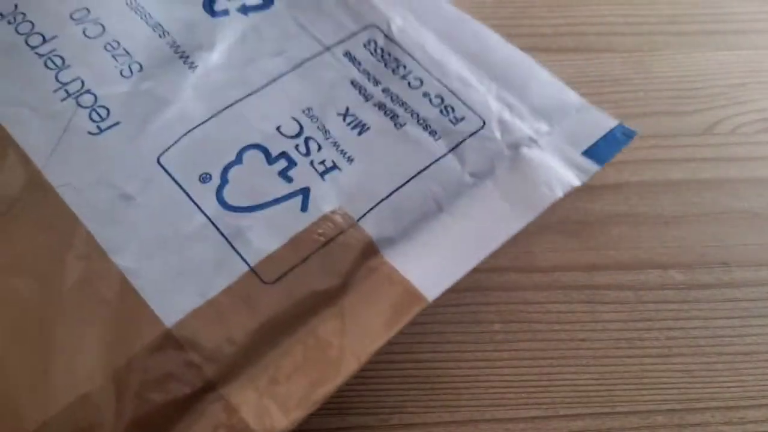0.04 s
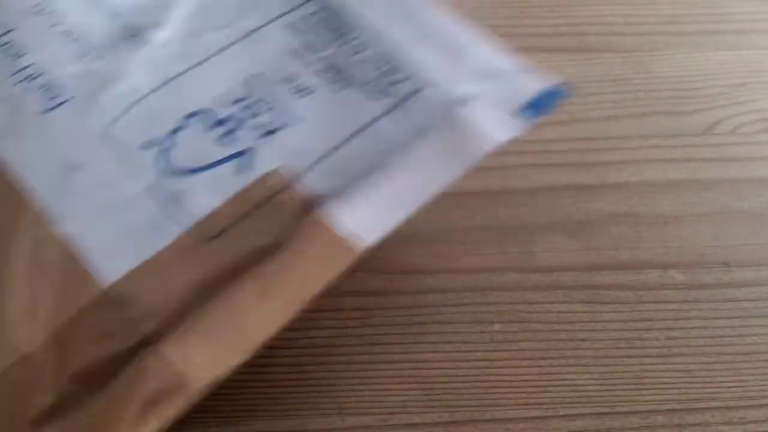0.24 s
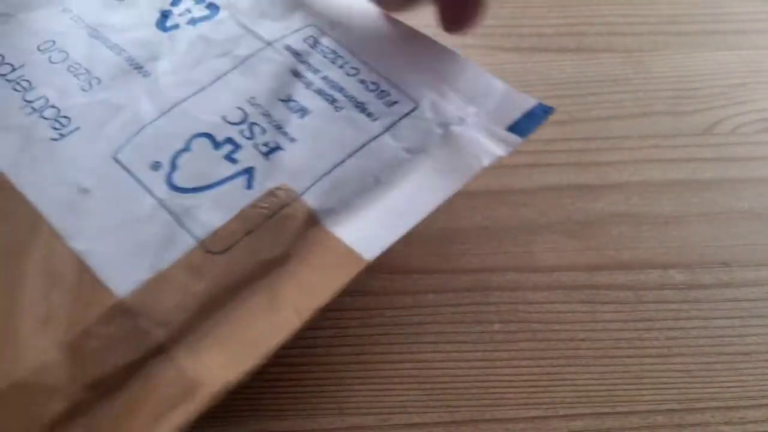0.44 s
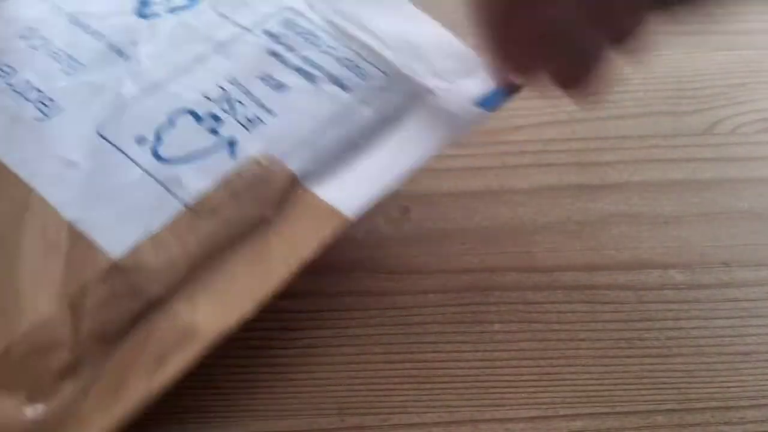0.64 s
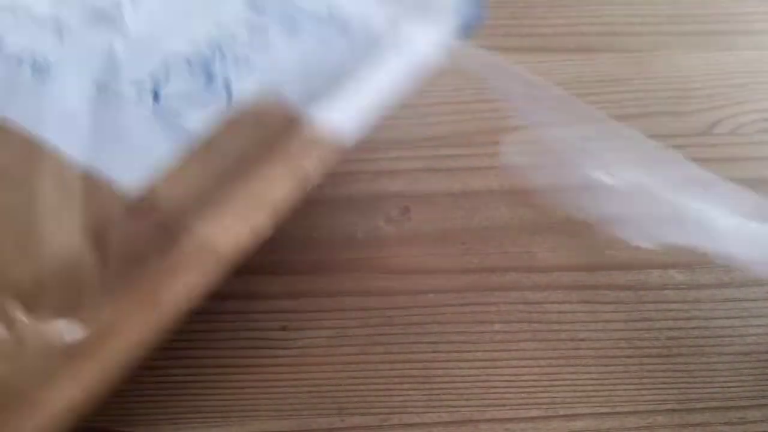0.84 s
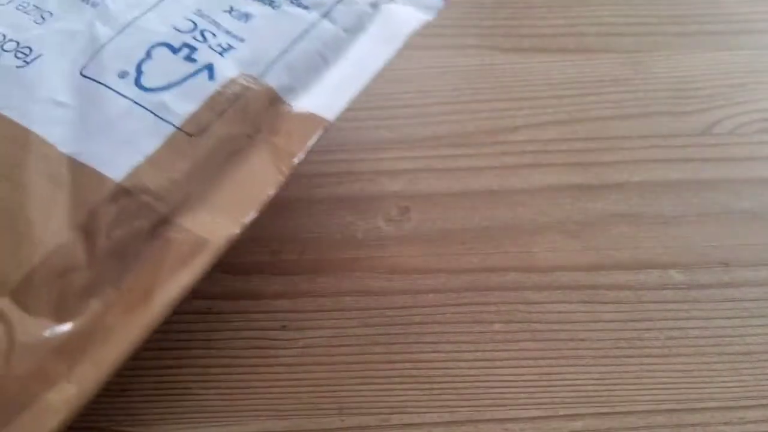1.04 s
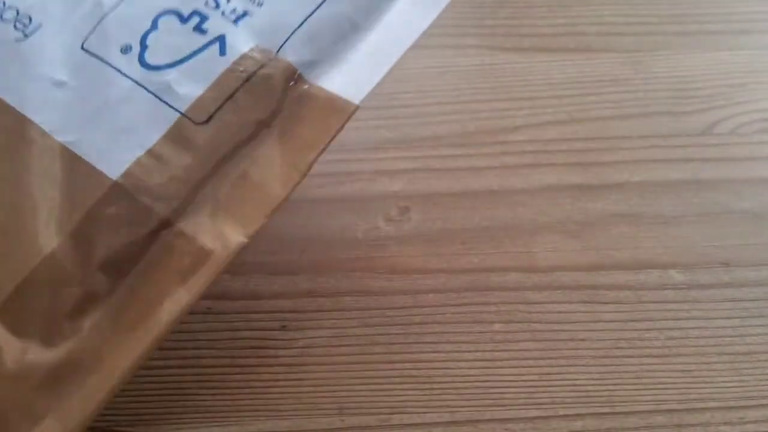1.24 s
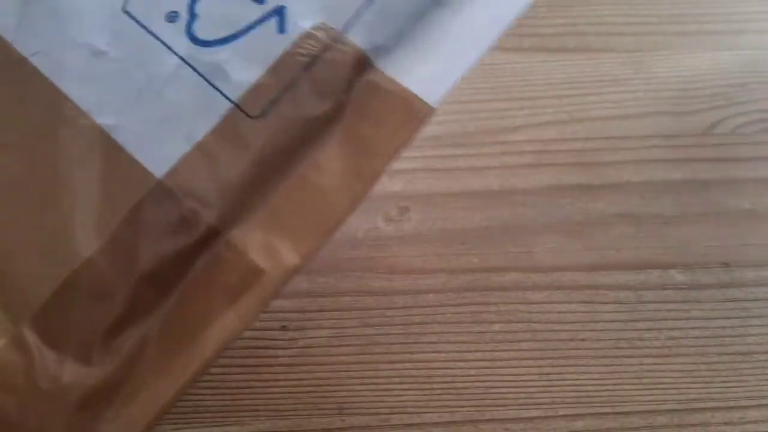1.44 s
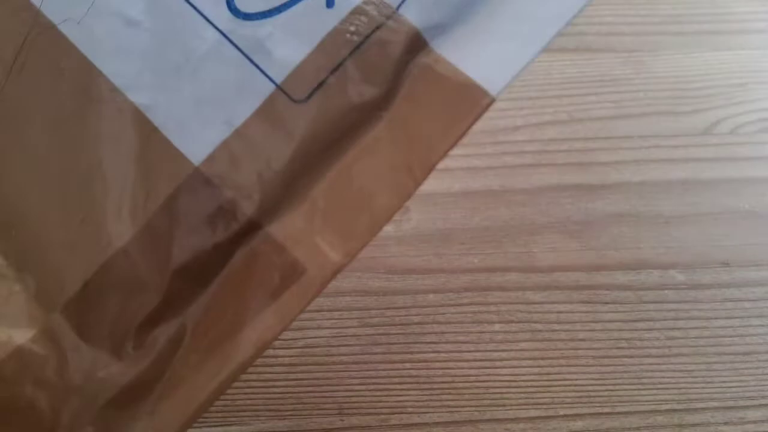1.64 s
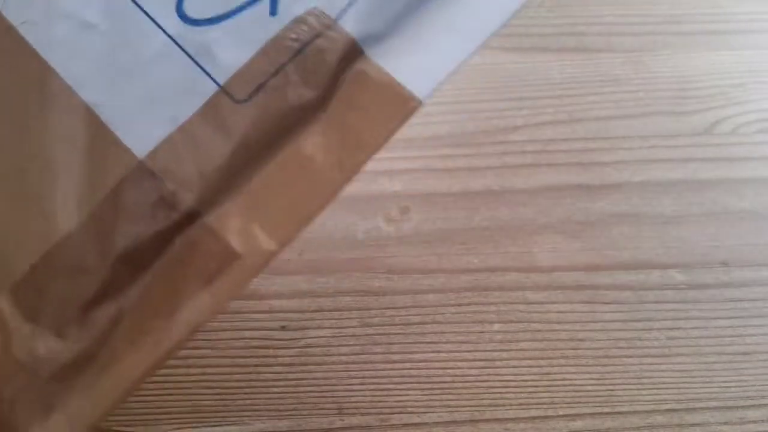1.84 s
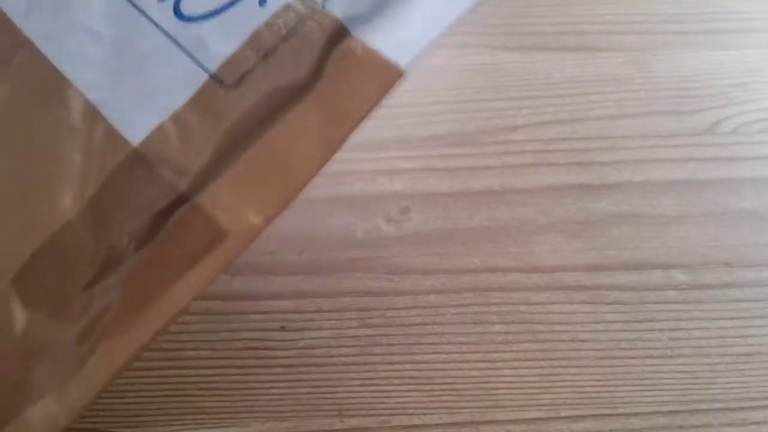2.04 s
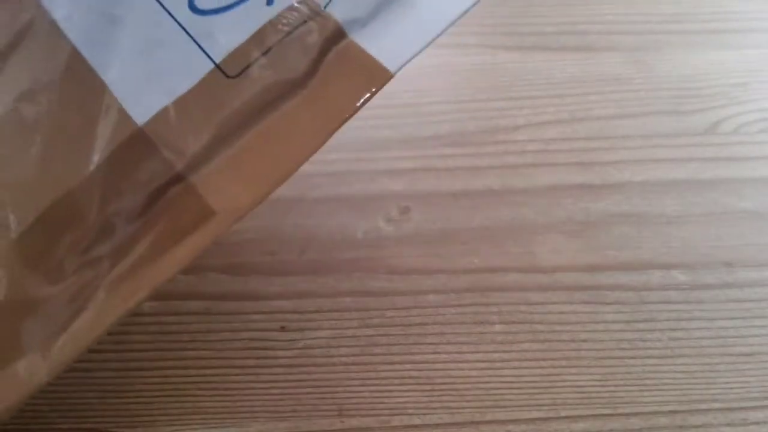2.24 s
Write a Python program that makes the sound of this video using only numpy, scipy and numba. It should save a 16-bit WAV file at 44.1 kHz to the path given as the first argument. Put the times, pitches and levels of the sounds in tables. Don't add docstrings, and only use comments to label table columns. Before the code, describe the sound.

Crackling padded paper mailer bent and pulled by hands on a wooden table, close up

```python
import sys
import numpy as np
from scipy import signal
from scipy.fft import rfft, irfft
from scipy.io import wavfile
from scipy.ndimage import uniform_filter1d
from numba import njit

SR = 44100
rng = np.random.default_rng(int(sys.argv[2]) if len(sys.argv) > 2 else 0)


def voltage_ratio(decibels):
    exponent = np.asarray(decibels, float) / 20
    return 10 ** exponent


def store_pcm(level_fs):
    pcm = np.round(np.clip(level_fs, -1, 1) * 32767).astype(np.int16)
    wavfile.write(sys.argv[1], SR, np.atleast_2d(pcm).T)


N = 101430

PORT_LAG_S, LAG_SPREAD_S = -0.000074, 0.00008
TREBLE_TOP_HZ = 15650
TABLE_PAN_DB = 3.5


def unit(x):
    return x / np.sqrt(np.mean(x ** 2))


def curve(table):
    times, values = np.array(table, float).T
    return np.interp(np.arange(N) / SR, times, values)


def colour_db(points, hz):
    freqs, levels = np.array(points, float).T
    return np.interp(np.log(np.maximum(hz, 1)), np.log(freqs), levels)


def noise(points, side):
    gain = voltage_ratio(colour_db(points, np.arange(N // 2 + 1) * SR / N))
    mid, dif = irfft(rfft(rng.standard_normal((2, N))) * gain, N)
    return unit(np.array([mid + side * dif, mid - side * dif]))


def walk(rate):
    hold = int(SR / rate)
    steps = np.repeat(rng.standard_normal(N // hold + 1), hold)
    return unit(uniform_filter1d(steps, hold)[:N])


@njit
def rings(n, start, turn, fade, size):
    out = np.zeros(n)
    for g in range(len(start)):
        first = int(np.ceil(start[g]))
        pole = np.exp(complex(-fade[g], turn[g]))
        z = size[g] * np.exp(complex(-fade[g], turn[g]) * (first - start[g]))
        for k in range(first, min(n, first + int(6 / fade[g]))):
            if k >= 0:
                out[k] += z.imag
            z *= pole
    return out


def grains(s, hz, t60, size, pan_db, lag_s):
    hz = np.clip(hz, 20, 0.45 * SR)
    turn = 2 * np.pi * hz / SR
    fade = np.log(1000) / (t60 * SR)
    return np.array([rings(N, (s + e * lag_s / 2) * SR, turn, fade, size * voltage_ratio(e * pan_db / 2))
                     for e in (1.0, -1.0)])


def top_cut(x, hz):
    return signal.sosfilt(signal.ellip(8, 0.2, 75, hz, fs=SR, output="sos"), x)


# start_s, peak_s, end_s, level_db, strongest pitch_hz
PULLS = [(-.05, 0.035, 0.091, -41.5, 2110), (.03, .15, 0.2, -60, 2000), (0.168, 0.233, 0.37, -46, 4950),
         (0.208, 0.277, 0.4, -29.5, 5260), (0.25, 0.308, 0.44, -30.5, 6200),
         (0.35, 0.423, 0.46, -37.5, 3080), (0.442, 0.494, 0.54, -30.5, 5400),
         (0.476, 0.518, 0.62, -38, 3160), (0.573, 0.604, 0.78, -38, 4100),
         (0.642, 0.651, 0.71, -25.5, 3000), (0.657, 0.674, 0.76, -25, 9500), (0.67, 0.71, 0.8, -27, 2430),
         (0.779, 0.812, 0.94, -40, 5000), (0.801, 0.859, 0.94, -31.5, 2300),
         (0.898, 0.912, 1.038, -48.5, 3830), (0.902, 1.062, 1.7, -57, 7640),
         (1.128, 1.167, 1.22, -49, 7700)]
# start_s, peak_s, end_s, level_db, strongest pitch_hz
LATER_PULLS = [(1.207, 1.27, 1.32, -47, 7100), (1.29, 1.33, 1.446, -49, 5700), (1.36, 1.43, 1.53, -65, 501),
               (1.54, 1.6, 1.93, -69.5, 2000), (1.649, 1.68, 1.714, -41.5, 1510),
               (1.656, 1.686, 1.8, -43.5, 7100), (1.764, 1.794, 1.95, -42.5, 1010), (1.8, 1.93, 2.3, -55, 2000),
               (1.81, 1.9, 1.91, -44.5, 3000), (1.893, 2, 1.7, -67, 1514), (1.969, 2.02, 2.057, -44.5, 2000),
               (2.022, 2.12, 2.12, -53.5, 2920), (2.137, 2.126, 2.253, -49.5, 2430),
               (2.233, 2.251, 2.36, -49.5, 1190), (2.245, 2.305, 2.34, -47, 3110)]
# pitch_hz, density level_db per Hz
PAPER = [(150, -42), (250, -20.5), (635, -5.5), (1950, -8), (9070, 1.5), (15500, 3)]
# pitch_hz, width_octaves, gain_db
PANELS = [(990, 0.27, 6.5), (4500, 0.28, 3), (8800, 0.26, 2)]
# time_s, left minus right level_db
PLACE = [
    (0, 1.5),
    (.3, 0),
    (.66, 1.5),
    (.9, -3.5),
    (1.16, -2.5),
    (1.24, 1),
    (1.68, -3),
    (1.95, 1),
    (2.07, -3.5),
    (2.3, 3),
]
GRAINS_PER_S = 26000
REST_DB = -79


def crackle():
    r = rng.random((int(GRAINS_PER_S * N / SR), 4)).T
    g = rng.standard_normal((len(r[0]), 3)).T
    s, at = r[0] * N / SR, (r[0] * N).astype(int)
    hz = 280 * 58 ** r[1] ** 0.613
    t60 = 5.5 / hz * 2 * np.exp(0.63 * g[0])
    db = colour_db(PAPER, hz) + 10 * np.log10(hz) - 1.3 * np.log10(hz / 4000)
    db = db - 2.5 * np.log(r[2] + 0.02)
    for panel_hz, octaves, gain_db in PANELS:
        db = db + gain_db * np.exp(-(np.log2(hz / panel_hz) / octaves) ** 2)
    mottle = np.array([walk(30) for _ in range(16)])
    db = db + 3.8 * mottle[(r[1] * 16).astype(int), at]
    db = db + 1.2 * walk(250)[at] + 1.3 * walk(70)[at]
    size = voltage_ratio(db) * np.sign(r[3] - 0.5)
    size = size / np.sqrt(np.mean(size ** 2 * t60) * GRAINS_PER_S / 28)
    power = voltage_ratio(2 * REST_DB)
    for start, peak, end, level_db, patch_hz in PULLS + LATER_PULLS:
        corners = [start, max(peak, start + 0.002), max(end, peak + 0.004)]
        swell = np.sin(np.pi / 2 * np.interp(s, corners, [0, 1, 0])) ** 2
        patch_db = 8.5 * (np.exp(-(np.log2(hz / patch_hz) / 1.74) ** 2) - 0.5)
        power = power + (swell * voltage_ratio(level_db + patch_db)) ** 2
    size = size * np.sqrt(power) * voltage_ratio(-0.05)
    pan_db = curve(PLACE)[at] + 6 * g[1]
    return top_cut(grains(s, hz, t60, size, pan_db, PORT_LAG_S + LAG_SPREAD_S * g[2]), TREBLE_TOP_HZ)


# time_s, peak level_db, pitch_hz
SNAPS = [(0.0912, -45.5, 4600), (0.1359, -38, 5430), (0.1865, -35.5, 7500), (0.2078, -25, 5440),
         (0.2224, -19, 4770), (0.2507, -15.5, 6700), (0.486, -16.5, 4700), (0.636, -19, 3400),
         (0.6504, -15, 9300), (0.8784, -11, 7310), (0.9058, -17.5, 7060), (1.056, -35.5, 5600),
         (1.1388, -39, 4100), (1.1528, -22.5, 9900), (1.2511, -22.5, 4200), (1.2733, -26, 8950),
         (1.324, -34.5, 3180), (1.3389, -19.5, 4500), (1.3681, -33, 2570), (1.6558, -26.5, 3160),
         (1.778, -20.5, 6500), (1.7874, -15.5, 2250), (1.8789, -26, 3000), (1.93, -34, 2400),
         (1.9824, -37, 3140), (2.0074, -30, 2900), (2.0665, -24, 4500), (.128, -49, 9500),
         (0.166, -48, 2850), (.178, -42, 10000), (0.2368, -23, 4800), (0.2922, -15, 4620),
         (.4718, -26.5, 4570), (.501, -21, 5000), (0.573, -28.5, 13000), (.598, -27, 8650),
         (.6714, -15, 9310), (.886, -24, 11000), (1.168, -33, 9000), (1.184, -37, 3300), (1.232, -38, 4000),
         (1.3106, -36.5, 3050), (1.388, -42, 5500), (1.7643, -32, 5880), (1.8726, -31, 6300),
         (1.9778, -37, 8030), (2.047, -47, 5000), (2.094, -42, 9000), (2.104, -41.5, 12010),
         (2.142, -40, 11000), (2.241, -40, 3020), (2.279, -39, 3070)]
SNAP_DB, SNAP_S, SNAP_CYCLES = -5, 0.001, 8.66
SNAP_TAIL_DB, SNAP_TAIL_S = -11, 0.0024


def snaps():
    s, db, pitch = np.repeat(np.array(SNAPS, float), 30, axis=0).T
    r, g = rng.random((len(s), 3)).T, rng.standard_normal((len(s), 3)).T
    number = np.arange(len(s))
    tail = number % 3 == 0
    late = np.where(tail, -SNAP_TAIL_S * np.log(r[0] + 0.0083), SNAP_S * r[0])
    hz = 1000 * 16.3 ** (((number % 30 + r[2]) / 30) ** 0.583)
    off_pitch_db = 7 * np.abs(np.log2(hz / pitch)) ** 1.62
    size = voltage_ratio(db + SNAP_DB + tail * SNAP_TAIL_DB - off_pitch_db)
    size = size * np.sign(r[1] - 0.5) * np.sqrt(hz / 6000)
    pan_db = curve(PLACE)[(s * SR).astype(int)] + 0.61 * g[1]
    return grains(s + late, hz, 2 * SNAP_CYCLES / hz, size, pan_db, PORT_LAG_S + LAG_SPREAD_S * g[2])


# time_s, peak level_db, pitch_hz
POPS = [(0.221, -26.5, 962), (.255, -31, 1120), (.292, -30, 940), (.32, -28.5, 600), (.424, -38, 750),
        (.48, -31, 1070), (.677, -21.5, 690), (.68, -18, 1210), (.851, -24, 1300), (0.652, -25, 670),
        (0.702, -19.5, 750), (0.877, -17, 1120), (1.183, -46, 657), (1.22, -37.5, 602), (1.251, -38.5, 580),
        (1.605, -47, 996), (1.657, -31, 993), (1.711, -38.5, 980), (1.786, -14.5, 894), (1.878, -36, 664),
        (2.01, -24.5, 917), (2.104, -37, 1200), (2.244, -39, 960), (1.167, -48, 890), (1.337, -42, 1010),
        (1.79, -27.5, 399), (1.93, -49, 400), (2.121, -45, 480), (1.929, -43, 1370), (1.97, -48, 800),
        (2.066, -39, 910), (2.135, -42, 942)]
POP_PARTIALS = [1, .68, 1.4, 1.9, 2.5]
POP_DB, POP_CYCLES, POP_LAG_S = 2, 4.88, -0.0002


def pops():
    s, db, hz = np.repeat(np.array(POPS, float), 5, axis=0).T
    r, g = rng.random((len(s), 2)).T, rng.standard_normal((len(s), 2)).T
    upper = np.arange(len(s)) % 5 != 0
    hz = hz * np.tile(POP_PARTIALS, len(POPS)) * np.exp(0.05 * g[0] * upper)
    size = voltage_ratio(db + POP_DB + 6.5 - 9.0 * upper)
    late = 0.001366 * r[0] * upper
    pan_db = 2.1 + 1.9 * g[1]

    def ring(cycles):
        return grains(s + late, hz, 2 * cycles / hz, size, pan_db, POP_LAG_S + 0 * s)

    return ring(POP_CYCLES) - ring(POP_CYCLES * 0.5)


# time_s, thud peak level_db, hollow ring relative level_db
BUMPS = [
    (0.877, -31.5, 2),
    (1.282, -32, 2.5),
    (1.315, -37.5, -16),
    (1.786, -40, 12.5),
    (2.01, -29.5, 4.5),
    (2.103, -38.5, -9),
]
# pitch_hz, level_db, t60_s
TABLE = [(98.6, 4.5, 0.07), (125, -2.5, 0.056), (199.3, 3.5, 0.055), (331, -2, 0.053)]
# pitch_hz, level_db, t60_s
HOLLOW = [(513.7, -4, 0.08), (401, -12, 0.053)]
BUMP_DB, HOLLOW_DB = -8, -6
DRAG_S, BUMP_PUSH_S = 0.00899, 0.0018


def bumps():
    s, db, hollow_db = np.repeat(np.array(BUMPS, float), 4, axis=0).T
    out = 0
    for modes, gain_db in ((TABLE, db + BUMP_DB), (HOLLOW, db + hollow_db + HOLLOW_DB)):
        for hz, mode_db, t60 in modes:
            g = rng.standard_normal((len(s), 4)).T
            late = DRAG_S * (np.arange(len(s)) % 4) * (1 + 0.301 * g[2]) / 2
            size = voltage_ratio(gain_db + mode_db - 320 * late + 2.0 * g[1])
            out = out + grains(s + late, hz * (1 + 0.018 * g[0]), t60 + 0 * s, size,
                               TABLE_PAN_DB + 4.3 * g[3], 0 * s)
    return uniform_filter1d(out, max(int(BUMP_PUSH_S * SR / 4), 1))


# time_s, peak level_db, pitch_hz
NUDGES = [(.217, -42, 73), (.274, -35, 72.6), (0.309, -35, 85), (.35, -29, 95), (.645, -33, 101),
          (.69, -36, 200), (.715, -30, 189), (.74, -30, 70), (.905, -37, 190), (1.22, -47, 200),
          (1.37, -44, 180), (1.805, -40.5, 62), (1.875, -39, 109), (1.918, -41, 96), (2.012, -33, 71.6),
          (2.146, -41.5, 84), (2.186, -48, 250), (2.244, -45, 382), (2.272, -44, 92.1)]
# time_s, peak level_db, pitch_hz, t60_s
HUMS = [
    (1.222, -55, 545, .1),
    (1.283, -57, 1270, 0.085),
    (1.325, -52.5, 540, .1),
    (1.355, -51, 535, .15),
    (1.37, -42.5, 530, .07),
    (1.44, -69, 846, .15),
    (1.80, -43, 920, .05),
    (1.803, -43.5, 630, .07),
]
NUDGE_CYCLES = 5.56


def nudges():
    s, db, hz = np.array(NUDGES, float).T
    hum_s, hum_db, hum_hz, hum_t60 = np.array(HUMS, float).T
    events = [np.r_[s, hum_s], np.r_[db, hum_db], np.r_[hz, hum_hz], np.r_[NUDGE_CYCLES / hz, hum_t60]]
    s, db, hz, t60 = np.repeat(events, 3, axis=1)
    g = rng.standard_normal((len(s), 3)).T
    s = s + 0.09 * t60 * (np.arange(len(s)) % 3)
    hz = hz * (1 + 0.014 * g[0])
    size = voltage_ratio(db + 2.5 + 2.7 * g[1])
    pan_db = TABLE_PAN_DB + 6.0 * g[2]

    def ring(decay):
        return grains(s, hz, decay, size, pan_db, 0 * s)

    return ring(t60) - ring(t60 * 0.27)


# time_s, level_db
RUMBLE = [(0, -55.5), (.15, -59.5), (.33, -48), (.45, -55), (.6, -54), (.74, -50), (.82, -53), (.9, -56.5),
          (1.2, -56), (1.55, -61), (1.95, -57), (2.05, -53.5), (2.3, -56)]
# pitch_hz, level_db per Hz
RUMBLE_COLOUR = [(13, -23.5), (22, -11), (48, 5.5), (71, 3.5), (182, -12), (318, -16), (400, -27.5),
                 (520, -53), (880, -120)]


def rumble():
    pan = np.array([[TABLE_PAN_DB], [-TABLE_PAN_DB]]) / 2
    return noise(RUMBLE_COLOUR, side=0.4) * voltage_ratio(curve(RUMBLE) + pan + 2.1 * walk(42))


WET_DB, ROOM_T60_S = -13, 0.2


def room(x):
    t = np.arange(SR // 3) / SR
    tail = rng.standard_normal((2, len(t))) * 1000 ** (-t / ROOM_T60_S) * (t > 0.003)
    tail /= np.sqrt(np.sum(tail ** 2, axis=1, keepdims=True))
    return voltage_ratio(WET_DB) * signal.fftconvolve(x.mean(axis=0)[None], tail, axes=1)[:, :N]


# pitch_hz, level_db per Hz
ROOM_HISS = [(120, -30), (200, -6.5), (365, -23), (392, -29.5), (812, -39), (15500, -49.5)]
ROOM_HISS_DB = -74.5


def room_hiss():
    return voltage_ratio(ROOM_HISS_DB) * noise(ROOM_HISS, side=0.76)


def scene():
    bag = crackle() + snaps() + pops() + bumps() + nudges()
    return bag + rumble() + top_cut(room(bag) + room_hiss(), TREBLE_TOP_HZ)


def band_limit(x):
    return signal.sosfilt(signal.butter(12, 16820, fs=SR, output="sos"), x)


def record(dry):
    bass_cut = signal.butter(3, 41.7, "high", fs=SR, output="sos")
    mix = signal.sosfilt(bass_cut, top_cut(dry, 16450))
    return band_limit(mix)


dry = scene()
out = record(dry)
store_pcm(out)
```